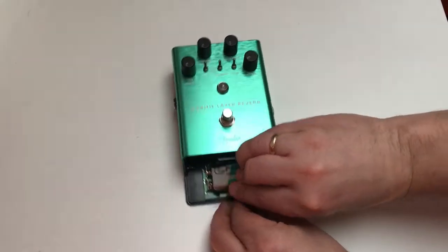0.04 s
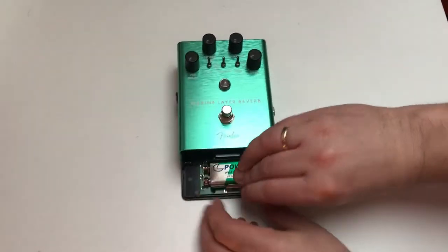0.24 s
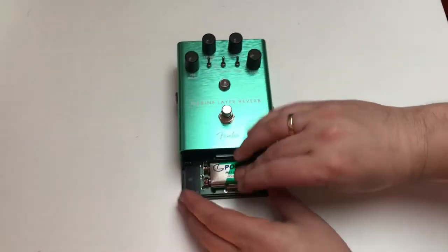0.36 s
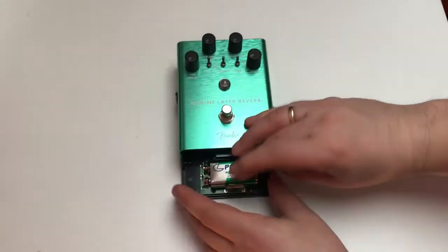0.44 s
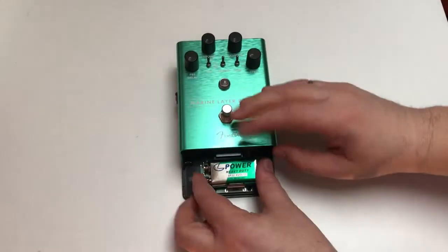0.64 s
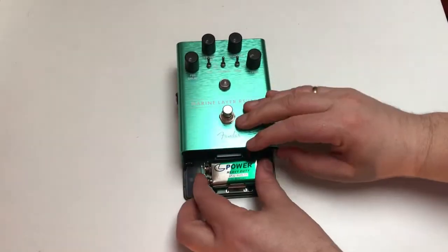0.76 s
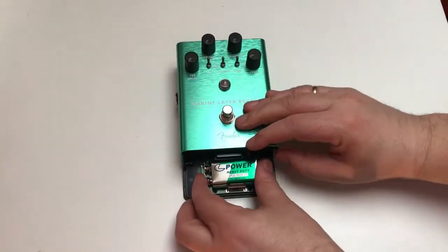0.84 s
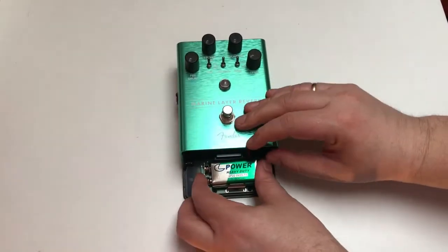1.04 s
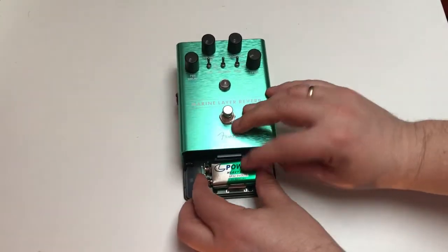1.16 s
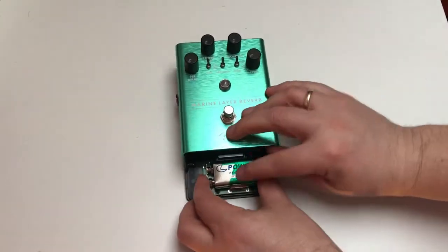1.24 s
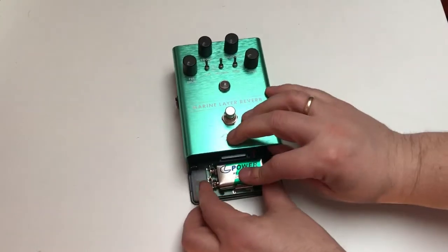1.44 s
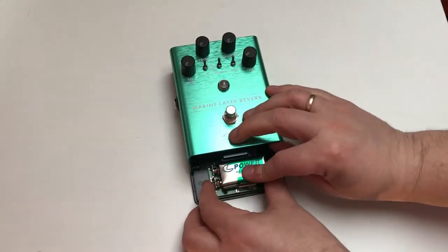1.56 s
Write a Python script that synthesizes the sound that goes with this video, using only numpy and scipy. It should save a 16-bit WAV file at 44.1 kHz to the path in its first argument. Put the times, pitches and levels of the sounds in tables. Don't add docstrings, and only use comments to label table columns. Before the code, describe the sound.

Battery clicking hard into a plastic compartment of a metal box, with faint handling and scraping

```python
import sys
import numpy as np
from scipy import signal
from scipy.fft import rfft, irfft, next_fast_len
from scipy.io import wavfile
from scipy.ndimage import uniform_filter1d, map_coordinates

SR = 44100
rng = np.random.default_rng(int(sys.argv[2]) if len(sys.argv) > 2 else 0)


def natural_amplitude(level_db):
    exponent = np.asarray(level_db, float) / 20
    return 10 ** exponent


def store_pcm(level_fs):
    pcm = np.round(np.clip(level_fs, -1, 1) * 32767).astype(np.int16)
    wavfile.write(sys.argv[1], SR, np.atleast_2d(pcm).T)


N = 70560

# time in seconds, hiss in dB, side wall hum in dB, share heard through the box 0-1.
SLIDE = [(0, -63.5, -70, 1), (.04, -65.5, -72.5, 0.36), (.4, -62, -78.5, 0.1), (.5, -59.5, -61.5, 0.38),
         (.64, -54, -52, 0.53), (.72, -56, -55.5, 1), (.8, -66, -55, 0.83), (.89, -70.5, -62, 0.77),
         (.92, -70.5, -95, 0.49), (1.1, -75.5, -89, 0.59), (1.27, -70, -81, 0.46), (1.3, -61.5, -72, 0.27),
         (1.34, -68.5, -84, 0.52), (1.365, -60.5, -82, 0.6), (1.4, -66.5, -89, 0.46), (1.53, -78, -83, 0),
         (1.55, -60, -82.5, 0), (1.6, -60, -76.5, 0.26)]
# pitch in Hz, level in dB per Hz.
SKIN = [(150, -32), (250, -3), (913, -9.5), (1380, -11.5), (2090, -7), (2710, -9), (7130, -16),
        (13500, -28), (15500, -34)]
# pitch in Hz, level in dB per Hz.
BRUSH = [(240, -32), (400, -5.5), (6950, -13.5), (13100, -20.5), (14800, -23)]
# pitch in Hz, width in Hz, level in dB.
BOX = [(755, 40, 0), (1040, 280, -4.5), (1360, 130, 0), (1770, 130, -4.5), (2740, 70, -5.5),
       (3600, 200, -5.5), (5400, 110, -5.5)]
BOX_DB = 15

# time in seconds, rumble in dB.
PUSH = [(0.0, -57), (0.034, -67), (0.08, -42.5), (0.196, -53.5), (0.218, -80), (0.254, -39), (0.324, -57),
        (0.44, -66), (0.574, -51.5), (0.64, -64), (0.698, -50), (0.722, -58.5), (0.762, -50),
        (0.864, -65.5), (1.184, -66), (1.332, -54.5), (1.42, -64.5), (1.6, -67.5)]
# pitch in Hz, level in dB per Hz.
WOOD = [(15, -43), (30, -11.5), (87, -1.5), (149, -12.5), (267, -24.5), (352, -16), (400, -29.5),
        (520, -53.5), (880, -120)]
# start in seconds, level in dB, pitch in Hz.
BUMPS = [
    (0.569, -47.5, 139.5),
    (0.685, -34.5, 82.5),
    (0.742, -31, 75.8),
    (1.23, -47.5, 141.6),
    (1.327, -44, 152),
]
# pitch in Hz, level in dB per Hz.
AIR = [(100, -28.5), (170, -1), (262, -9), (451, -15), (1670, -26), (12700, -37.5), (15000, -36)]

# pitch in Hz, level in dB, time to fall 60 dB in seconds.
LID_SIDE = [(626, -16, .2), (904, -12.5, 0.15)]
LID_T60_S = [.28, .08]
# start in seconds, level in dB, pitch in Hz, time to fall 60 dB in seconds,
# crack in dB against the note.
TICKS = [(0.052, -33, 11800, 0.021, -10.5), (0.0522, -26, 4230, 0.0066, -16.5),
         (0.054, -41, 1855, 0.089, -4.5), (0.197, -62, 2700, .03, 16), (0.2015, -42.5, 2790, 0.026, -8),
         (0.2045, -39.5, 2750, 0.027, 4), (0.209, -47, 2750, 0.021, 6.5), (0.2140, -33, 2770, 0.02, -8.5),
         (0.2216, -29, 8150, 0.015, -5.5), (0.228, -29, 8500, .02, -19), (0.2295, -29, 5200, .02, -7),
         (0.2214, -45, 2700, 0.023, -3), (0.2278, -38.5, 2700, 0.044, -8), (0.2357, -8, 12900, 0.018, -6),
         (0.2511, -4.5, 6800, 0.009, -32), (0.5410, -33, 2796, 0.022, -15), (0.562, -53, 490, 0.088, -25.5),
         (0.622, -48, 505, .08, -18), (0.6582, -21, 1884, 0.016, -20), (0.6582, -45.5, 8470, .01, 6.5),
         (0.659, -41, 1058, 0.058, -21), (0.665, -41, 1389, 0.083, -11), (0.733, -57, 8800, .015, 3),
         (0.7600, -47.5, 1950, .03, -6.5), (1.1372, -62, 3476, 0.032, 5.5), (1.1920, -57, 1039, 0.063, -4),
         (1.2270, -58, 755, 0.12, -30), (1.2510, -59.5, 3540, 0.034, 5.5), (1.3480, -51, 1420, .04, -20),
         (1.477, -55.5, 1188, 0.026, -15), (1.578, -43.5, 333.4, 0.21, -32.5)]

# start in seconds, level in dB, time to fall 60 dB in seconds,
# snap 0 (first) or 1 (second).
CONTACTS = [
    (0.0670, -38.5, .02, 0),
    (0.0690, -16.5, .008, 0),
    (0.0722, -26.5, .01, 0),
    (0.0825, -35, .01, 0),
    (0.234, -3, .008, 1),
    (0.2360, -7.5, .008, 1),
    (0.2376, -14.5, .006, 1),
    (0.2416, -8.5, .01, 1),
    (0.2465, -15.5, .008, 1),
    (0.2487, -17.5, .008, 1),
]
# pitch in Hz, level in dB per Hz.
EDGE = [(800, -38), (2700, -7), (4200, -6), (8500, 2), (12500, -4.5), (15500, -25)]
BLUR_HZ, BLUR_DB = 266, 7.5

# start in seconds, level in dB, hold in seconds, lid in dB, table in dB.
SNAPS = [
    (0.0688, -21, 0.0014, -30, -41),
    (0.2343, -5.5, 0.0039, -22.5, -30.5),
]
# pitch in Hz, level in dB,
# time to fall 60 dB in seconds.
SEAT = [(1040, -9.5, 0.13), (1313, -10, 0.14), (1895, 0, 0.057), (2350, -4.5, 0.062), (2700, -2, 0.048),
        (3130, -3.5, 0.093), (3914, -6, .06), (5200, -4.5, .06), (7000, -4.5, 0.073), (9260, 0.5, 0.051)]
LATCH = [(1033, -6, 0.13), (1447, -6, 0.092), (2073, -7, 0.13), (2584, -3.5, 0.15), (2810, -1, 0.1),
         (3890, 3, 0.14), (5446, -7, 0.083), (5870, 1.5, 0.052), (6680, -2.5, 0.1), (7500, -6, 0.093),
         (9430, -9, 0.18), (11560, -8, 0.059), (12900, -4, 0.051)]
# pitch in Hz, level in dB per Hz.
SEAT_AIR = [(88, -31), (150, -5), (520, -30), (760, -16), (1500, -10.5), (2700, -7), (8230, -12),
            (13000, -26.5), (16000, -47)]
LATCH_AIR = [(88, -44), (150, -24.5), (790, -18), (1240, -12), (2810, -2.5), (4200, -10), (6770, -7),
             (13200, -6), (16000, -45.5)]
RING_DB = [-12, -12]
SPRAY_T60_S = [0.076, .05]
# pitch in Hz, level in dB per Hz.
SEAT_TAIL = [(560, -24.5), (950, -9.5), (1370, -2), (4330, -9), (5640, -14), (8330, -11), (14800, -27.5)]
LATCH_TAIL = [(560, -40), (950, -16), (1750, -13), (2650, -3), (4280, -15), (5840, -8), (13200, -24),
              (14800, -31.5)]
TAIL_DB = [-42.5, -21.5]
TAIL_T60_S = [0.46, 0.2]
# pitch in Hz, level in dB, time to fall 60 dB in seconds.
TABLE = [(47, 0.5, .25), (92, -9, .2), (148, -0.5, 0.15), (250, -6, 0.037), (358.7, -4.5, 0.14)]

# start in seconds, level in dB, pitch in Hz, time to
# fall 60 dB in seconds.
LONE_NOTES = [
    (0.200, -50, 2740, .2),
    (0.245, -35.5, 2630, 0.23),
    (0.665, -50, 753, 0.34),
    (1.252, -61.5, 750, .15),
    (1.368, -59.5, 755, 0.25),
    (1.352, -53.5, 1780, .1),
]
# time in seconds, level in dB.
SCRAPE = [
    (0, -110),
    (1.283, -100),
    (1.292, -66.5),
    (1.335, -58.5),
    (1.344, -63.5),
    (1.349, -51.5),
    (1.372, -54.5),
    (1.382, -57.5),
    (1.41, -73),
    (1.6, -110),
]
# pitch in Hz, width in Hz, level in dB.
RIM = [(750, 68, -5), (1390, 90, 4), (1870, 110, -0.5), (2790, 200, 4), (4100, 200, -0.5), (5300, 220, -1),
       (7100, 400, -6), (8900, 403, -6.5)]
# pitch in Hz, time to fall 60 dB in seconds.
ROOM = [(200, 0.27), (800, .22), (3000, 0.067), (8000, 0.081), (15000, 0.11)]


def unit(x):
    return x / np.sqrt(np.mean(x ** 2) + 1e-20)


def along(points, hz):
    f, v = np.transpose(points)
    return np.interp(np.log(hz + 1), np.log(f + 1), v)


def curves(rows):
    s, *cols = np.transpose(rows)
    return [np.interp(np.arange(N) / SR, s, c) for c in cols]


def wobble(rate):
    return map_coordinates(rng.standard_normal(N // 20), [np.arange(N) * rate / SR])


def noise(spectrum, size, peaks=(), peak_db=0):
    m = next_fast_len(size + 8192)
    f = np.fft.rfftfreq(m, 1 / SR)
    lift = 1 + sum(natural_amplitude(peak_db + db) / (1 + (2 * (f - hz) / w) ** 2) for hz, w, db in peaks)
    shaped = rfft(rng.standard_normal(m)) * natural_amplitude(along(spectrum, f)) * lift
    return unit(irfft(shaped, m)[:size])


def ring(modes, t, rise_s):
    notes = sum(natural_amplitude(db - 60 * t / t60) * np.sin(2 * np.pi * hz * t) for hz, db, t60 in modes)
    return notes * (1 - np.exp(-t / rise_s))


def add(track, s, sound):
    part = track[round(s * SR):][:len(sound)]
    part += sound[:len(part)]


def fingers():
    slide_db, wall_db, share = curves(SLIDE)
    share = np.clip(share, 0, 1)
    bare = np.sqrt(1 - share) * noise(BRUSH, N)
    boxed = np.sqrt(share) * noise(SKIN, N, BOX, BOX_DB)
    grain = natural_amplitude(1.6 * wobble(400) + wobble(40))
    wide_hz = 30
    pitch_hz = np.interp(np.arange(N) / SR, [.45, .6], [1170, 1290])
    band = [(1, 0), (wide_hz / 2, -3), (wide_hz * 2, -14), (1000, -45)]
    turn = 2 * np.pi * np.cumsum(pitch_hz) / SR
    hum = unit(noise(band, N) * np.cos(turn) + noise(band, N) * np.sin(turn))
    return natural_amplitude(slide_db) * (bare + boxed) * grain + natural_amplitude(wall_db - 3 + 3.5 * wobble(31)) * hum


def table():
    push_db, = curves(PUSH)
    rumble = noise(WOOD, N)
    loudness = np.sqrt(np.abs(uniform_filter1d(rumble ** 2, size=1500)) + .1)
    out = natural_amplitude(push_db) * unit(rumble / loudness)
    t = np.arange(SR // 4) / SR
    for s, db, hz in BUMPS:
        add(out, s, natural_amplitude(db) * ring([(hz, 0, .15), (1.848 * hz, -8, .12)], t, 0.0081))
    return out


def room_air():
    return natural_amplitude(-66 + wobble(8)) * noise(AIR, N)


def lid(t):
    middle_hz, beat_hz, swell_s, held_s = 748, 31, .004, .11
    upper_t60, lower_t60 = LID_T60_S
    upper = ring([(middle_hz + beat_hz / 2, -4, upper_t60)], t, swell_s)
    lower = ring([(middle_hz - beat_hz / 2, 0, lower_t60)], t, swell_s)
    choke = np.exp(-(t / held_s) ** 4)
    return (upper - lower + ring(LID_SIDE, t, swell_s)) * choke


def ticks():
    out, t = np.zeros(N), np.arange(SR // 4) / SR
    for s, db, hz, t60, crack_db in TICKS:
        tick = ring([(hz, -2, t60), (hz * .93, -16, 2 * t60)], t, .0007)
        crack_fade = natural_amplitude(crack_db - 2 - 60 * t / (2 * t60)) * (1 - np.exp(-t / 0.000087))
        tick = tick + crack_fade * noise(SKIN[2:], len(t))
        if 999 < hz < 3100:
            body_fade = natural_amplitude(-20 - 60 * t / (3 * t60)) * (1 - np.exp(-t / 0.013))
            tick = tick + body_fade * noise(SKIN, len(t), BOX, BOX_DB) + natural_amplitude(-24) * lid(t)
        add(out, s, natural_amplitude(db) * tick)
    return out


def contacts():
    out, t = np.zeros(N), np.arange(SR // 20) / SR
    for s, db, t60, snap in CONTACTS:
        tray = LATCH if snap > .5 else SEAT
        peaks = [(hz, 2 * BLUR_HZ, level) for hz, level, _ in tray]
        fade = natural_amplitude(db - 60 * t / t60) * np.minimum(t / .0001, 1)
        add(out, s, fade * noise(EDGE, len(t), peaks, BLUR_DB))
    return out


def snaps():
    out, t = np.zeros(N), np.arange(SR // 2) / SR
    damping, rough_hz = .35, 120
    for k, (s, db, hold_s, lid_db, table_db) in enumerate(SNAPS):
        modes = (SEAT, LATCH)[k]
        peaks = [(hz, BLUR_HZ, level) for hz, level, _ in modes]
        spray_fade = natural_amplitude(-60 * np.maximum(t - hold_s, 0) / SPRAY_T60_S[k]) * np.minimum(t / .0003, 1)
        spray = noise((SEAT_AIR, LATCH_AIR)[k], len(t), peaks, BLUR_DB) * spray_fade
        tray = np.zeros(len(t))
        for hz, level, t60 in modes:
            tray += ring([(hz, level, damping * t60)], t, 0.00066) * (1 + wobble(rough_hz)[:len(t)])
        rattle_fade = natural_amplitude(TAIL_DB[k] - 60 * t / TAIL_T60_S[k]) * (1 - np.exp(-t / 0.0055))
        rattle = noise((SEAT_TAIL, LATCH_TAIL)[k], len(t)) * rattle_fade
        thump = natural_amplitude(table_db) * ring(TABLE, t, .006)
        plastic = natural_amplitude(db - 4.5) * spray + natural_amplitude(db + RING_DB[k]) * tray
        add(out, s, plastic + rattle + natural_amplitude(lid_db) * lid(t) + thump)
    return out


def lone_notes():
    out, t = np.zeros(N), np.arange(SR // 4) / SR
    for s, db, hz, t60 in LONE_NOTES:
        add(out, s, natural_amplitude(db) * ring([(hz, 0, t60), (hz * 0.92, -6, t60)], t, 0.0022))
    return out


def scrape():
    level_db, = curves(SCRAPE)
    return natural_amplitude(level_db + 2.8 * wobble(500)) * noise(BRUSH[1:], N, RIM, peak_db=9.5)


def room(x):
    hz, t, z = signal.stft(rng.standard_normal(SR // 2), SR, nperseg=256)
    fade = natural_amplitude(-60 * t / along(ROOM, hz)[:, None])
    tail = signal.istft(z * fade, SR, nperseg=256)[1]
    late = np.pad(x, (200, 0))
    return signal.fftconvolve(late, tail / np.linalg.norm(tail))[:N]


def scene():
    hits = ticks() + contacts() + snaps() + lone_notes()
    return (fingers() + table() + room_air() + hits + natural_amplitude(-12) * room(hits) + scrape())[None]


def band_limit(x):
    return signal.sosfilt(signal.butter(12, 16270, fs=SR, output="sos"), x)


def record(dry):
    ceiling, low_hz, top_hz = .72, 37, 14700
    soft = dry / (1 + np.abs(dry / ceiling) ** 4) ** (1 / 4)
    no_deep = signal.sosfilt(signal.butter(3, low_hz, "high", fs=SR, output="sos"), soft)
    mix = signal.sosfilt(signal.cheby1(13, .5, top_hz, fs=SR, output="sos"), no_deep)
    return band_limit(mix)


dry = scene()
out = record(dry)
store_pcm(out)
```